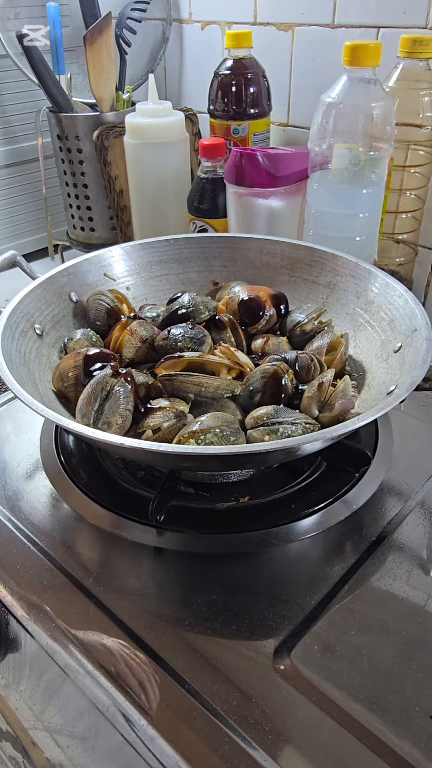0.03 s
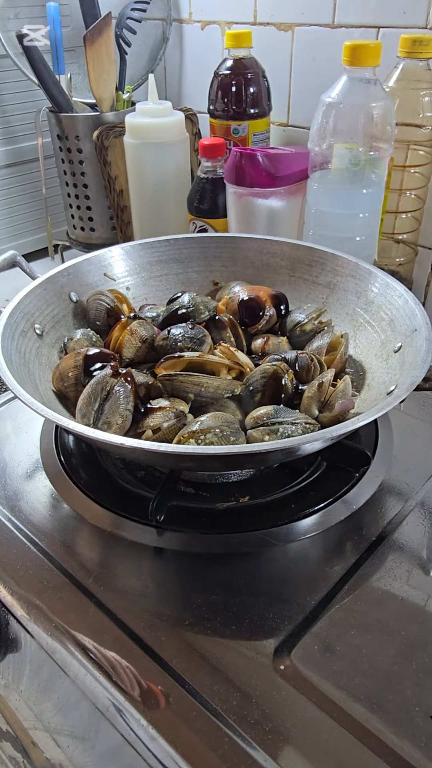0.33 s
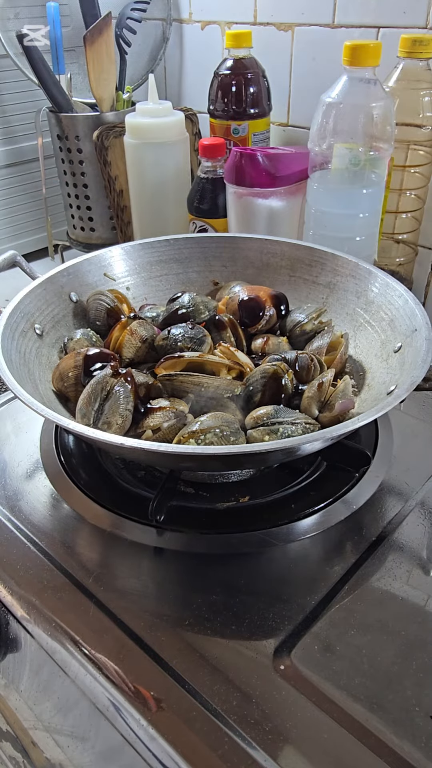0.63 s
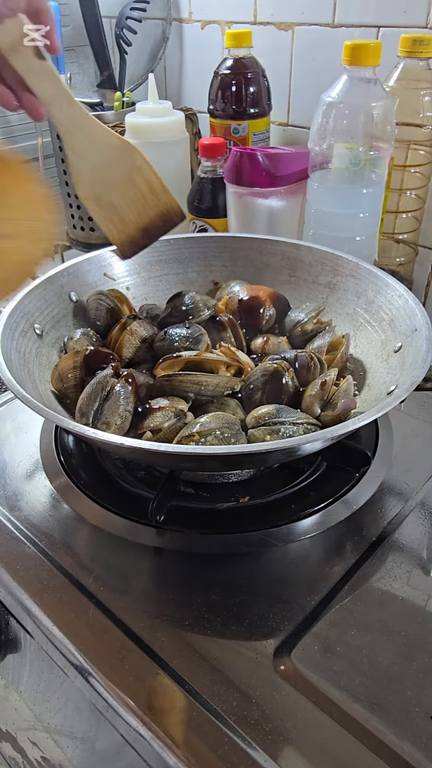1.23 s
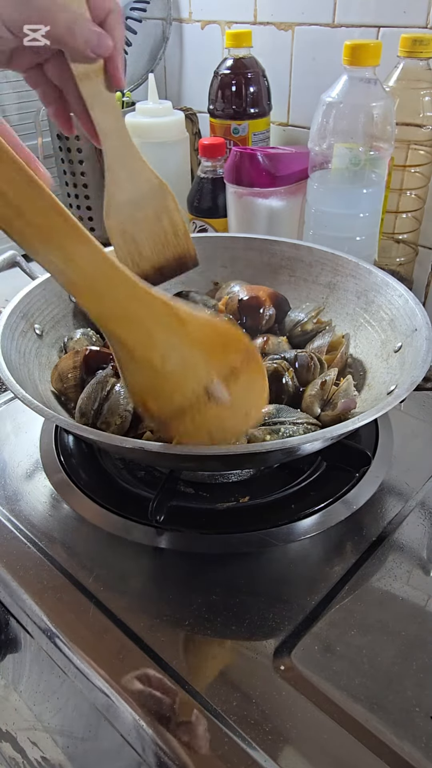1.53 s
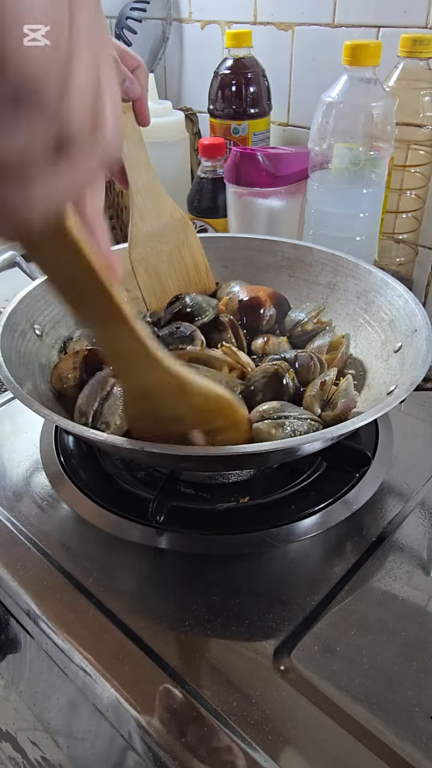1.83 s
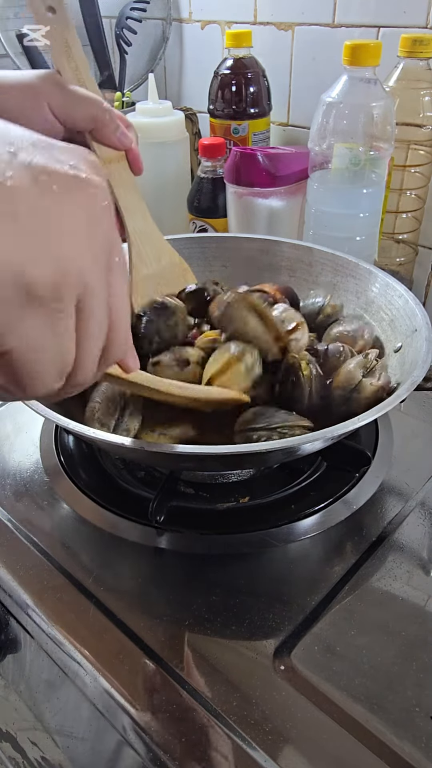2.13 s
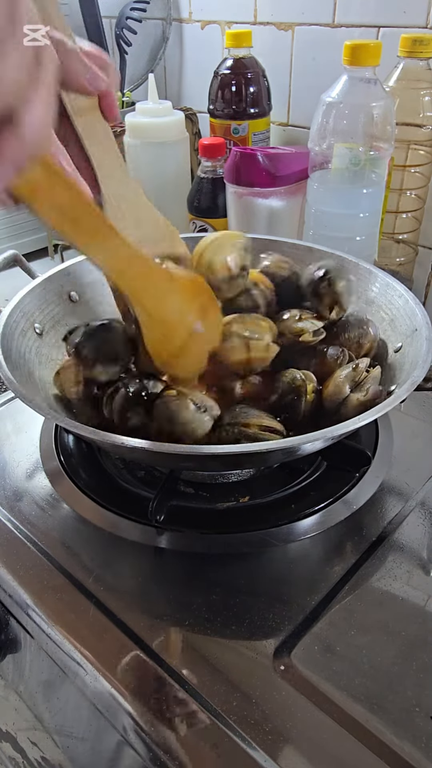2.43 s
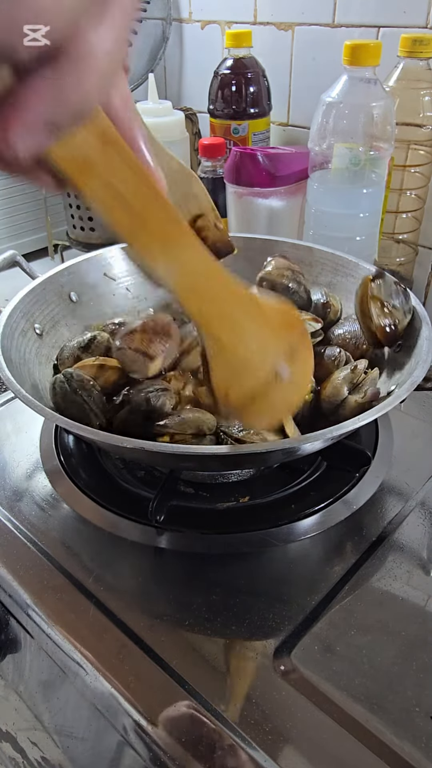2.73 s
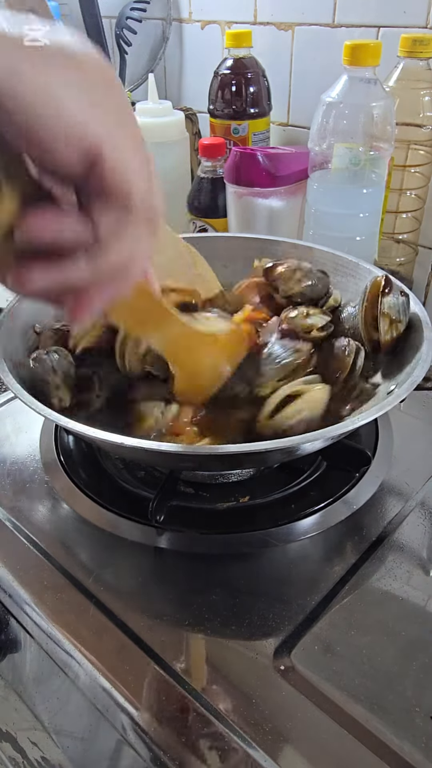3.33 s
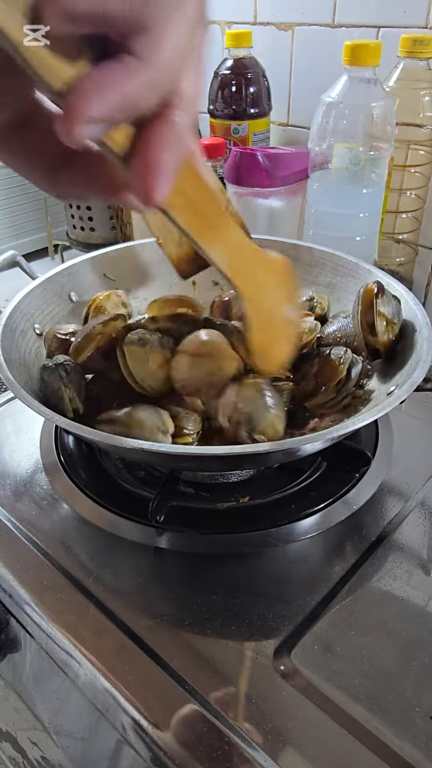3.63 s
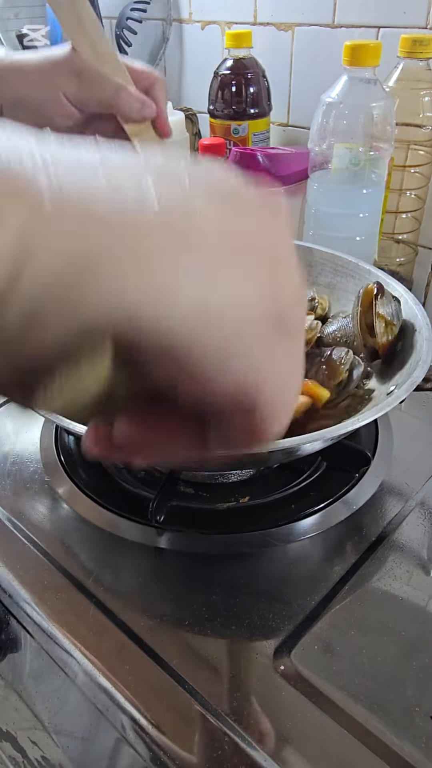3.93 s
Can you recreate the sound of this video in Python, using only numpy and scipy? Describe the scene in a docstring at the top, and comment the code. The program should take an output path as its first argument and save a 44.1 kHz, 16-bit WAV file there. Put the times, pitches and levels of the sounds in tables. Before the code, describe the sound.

Clam shells clack, clink and grind as wooden spatulas stir them around a metal wok. Before the stirring starts, only sauce sizzles softly over a low gas stove rumble, heard close in a small tiled kitchen.

```python
"""Clams stirred in a wok

Sauce sizzles over a rumbling gas stove in a small tiled kitchen; the sound drops out briefly near 0.9 s.
Two wooden spatulas then tap in and push the heap round: shells grind on the metal, clack and clink.
The wok rings faintly with each clack, and clearly when one shell lands on bare metal."""
import sys
import numpy as np
from scipy import signal
from scipy.io import wavfile

SR = 44100
rng = np.random.default_rng(int(sys.argv[2]) if len(sys.argv) > 2 else 0)


def to_wav(sig):
    """Store sig (one row per channel, or 1-D mono) as 16-bit WAV at the path in sys.argv[1].

    Samples outside -1..1 are clipped; the rate is SR.
    """
    pcm = np.clip(np.atleast_2d(sig), -1, 1) * 32767
    pcm = np.round(pcm).astype(np.int16)
    wavfile.write(sys.argv[1], SR, pcm.T)  # frames by channels


N = 176400
TIME = np.arange(N) / SR
CUTOFF_HZ = 15900

# shell and spatula impacts: start_s, level_db, then offsets thud_db, body_db, edge_db, sparkle_db
IMPACTS = [(1.289, -23.5, -16.5, -13.5, -10.5, -22), (1.4228, -25, -12, -12, -12, -28),
           (1.5846, -21.5, -12.5, -10.5, -15, -19), (1.8698, -23.5, -34, -3.5, -6.5, -29),
           (1.888, -16.5, -37, -6, -7.5, -37), (1.896, -20, -29, -4, -12, -32),
           (1.9147, -17.5, -21, -5.5, -19, -17), (2.0553, -20, -19, -3.5, -9, -36),
           (2.1029, -19, -13.5, -5.5, -12, -25), (2.137, -11, -32, -10, -8.5, -12.5),
           (2.1445, -11.5, -37, -8, -15, -41), (2.1634, -16.5, -32, -6, -24, -21),
           (2.2733, -22.5, -34, -8, -6, -19), (2.2913, -15, -24, -14.5, -9, -14.5),
           (2.4105, -13.5, -15, -22, -6.5, -17), (2.4276, -11.5, -17, -11.5, -11.5, -11),
           (2.4561, -10.5, -17, -10.5, -12, -15.5), (2.5786, -8, -18, -14, -13.5, -4),
           (2.6171, -13, -22, -8.5, -18, -15), (2.6312, -11.5, -28, -11, -10, -10),
           (2.6442, -15, -33, -7, -9, -21), (2.6755, -9.5, -22, -15, -13, -11),
           (2.6927, -16.5, -31, -8, -11, -14), (2.7007, -7, -25, -11.5, -14.5, -15),
           (2.7075, -9.5, -23, -11, -9.5, -15), (2.732, -13, -17.5, -21, -9, -18),
           (2.81, -16, -16, -30, -10, -17), (2.9754, -19, -15, -14, -16, -30),
           (3.1258, -19.5, -13, -5.5, -29, -27), (3.1809, -19, -20, -15, -11.5, -15),
           (3.3331, -26, -41, -10, -11, -35), (3.351, -18, -27, -6, -9, -25),
           (3.3647, -9, -15, -9.5, -16.5, -13.5), (3.4223, -15.5, -12, -16, -10, -16),
           (3.5149, -16, -28, -23, -8, -19), (3.5684, -9, -23.5, -16, -8.5, -17),
           (3.5759, -4, -32, -9.5, -12.5, -11), (3.6179, -15, -14.5, -15, -16, -12),
           (3.6341, -5.5, -36, -12, -12.5, -20), (3.6473, -11.5, -28, -20, -16, -15),
           (3.6595, -16, -17, -15, -9.5, -13), (3.7075, -20, -21, -18, -8.5, -12),
           (3.923, -17, -22, -11, -12, -12), (3.933, -20, -25, -8, -7.5, -19),
           (3.9617, -13, -38, -22, -8.5, -10.5)]


def clack(levels_db):
    """One struck shell: a noisy crack plus random modes, decaying in four bands."""
    # clack bands, thud to sparkle: low_hz, high_hz, gain_db, t60_s
    registers = [(217, 910, -2.5, 0.077), (943, 3000, -5, 0.019), (2690, 5570, -2, 0.022),
                 (5700, 14500, -6, 0.029)]
    mode_count, crack_share, chatter_s = 60, 0.63, 0.003
    t = TIME[:SR // 14]
    hz = np.geomspace(230, 15000, mode_count) * np.exp(rng.uniform(-.04, .04, mode_count))
    weights = rng.standard_normal((2, mode_count)) * np.sqrt(hz)
    modes = rms_one(weights @ np.sin(2 * np.pi * hz[:, None] * t))
    crack = rng.standard_normal((2, len(t)))
    struck = wok_body(np.sqrt(1 - crack_share) * modes + np.sqrt(crack_share) * crack)
    out = 0
    for db, (low_hz, high_hz, gain_db, t60_s) in zip(levels_db, registers):
        envelope = decay(np.maximum(t - chatter_s, 0), t60_s)
        part = band(band(struck, low_hz, high_hz) * envelope, low_hz, high_hz)
        onset_rms = np.sqrt(np.mean(part[:, :SR // 100] ** 2, axis=1, keepdims=True))
        out = out + from_db(db + gain_db) * stereo(*(part / onset_rms), np.sqrt(low_hz * high_hz))
    return lowpass(out, 9200)  # sauce cushions the contact


def clacks():
    """Spatulas tap; shells fall on each other and on the wok."""
    out = np.zeros((2, N + SR))
    for start_s, level_db, *offsets_db in IMPACTS:
        start = int(start_s * SR)
        sound = clack(level_db + np.array(offsets_db))
        out[:, start:start + sound.shape[1]] += sound
    return out[:, :N]


def clinks():
    """Pitched contacts, wooden bump to shell clink: a main mode and a shorter, higher twin."""
    # pitched contacts: start_s, pitch_hz, level_db, t60_s
    contacts = [(1.586, 686, -32, 0.11), (1.585, 3180, -24, 0.03), (1.728, 421, -28.5, 0.042),
                (1.890, 2890, -17.5, 0.044), (1.916, 2160, -22, .03), (2.144, 4800, -11, 0.014),
                (2.200, 1382, -21.5, 0.056), (2.292, 3760, -22, 0.023), (2.580, 7300, -18, 0.034),
                (2.619, 2146, -10.5, 0.036), (2.619, 1385, -19, .09), (2.632, 2025, -12, 0.053),
                (2.633, 1050, -20.5, 0.11), (2.693, 2240, -16, .03), (2.703, 1941, -17.5, 0.12),
                (2.976, 5200, -25, .012), (3.028, 5630, -28, 0.071), (3.036, 6500, -28, 0.036),
                (3.126, 6500, -26.5, 0.037), (3.334, 4000, -16.5, 0.031), (3.428, 4650, -23, 0.035),
                (3.515, 2710, -19, 0.032), (3.635, 2120, -7, 0.04), (3.635, 2400, -10, .028),
                (3.649, 2260, -7.5, 0.026), (3.963, 1060, -21, 0.094)]
    out = np.zeros((2, N))
    for start_s, pitch_hz, level_db, t60_s in contacts:
        click = np.zeros(N)
        click[int(start_s * SR)] = from_db(level_db)
        twin_hz = pitch_hz * (1 + 0.051 * rng.uniform(0.2, 2.5))
        out += stereo(ring(click, pitch_hz, t60_s), ring(click, twin_hz, t60_s / 2), pitch_hz)
    return out


def wok_ring():
    """Each impact excites the wok's free modes; a hit on bare metal does so most."""
    # wok modes: pitch_hz, gain_db, t60_s
    modes = [(2401, -14, .3), (2923, -10, 0.25), (3021, 3, 0.32), (3090, -5, 0.33), (3709, -12, .35)]
    coupling_db, bare_hit_s, bare_hit_db = -34, 2.704, -19.5
    blows = np.zeros(N)
    for start_s, level_db, *_ in IMPACTS:
        blows[int(start_s * SR)] = from_db(level_db + coupling_db)
    blows[int(bare_hit_s * SR)] = from_db(bare_hit_db)
    return sum(from_db(db) * ring(blows, hz, t60_s) for hz, db, t60_s in modes)


def wok_body(x):
    """The loaded bowl lifts a few broad resonances."""
    # bowl resonances: centre_hz, width_hz, lift_db
    resonances = [(273, 25, 5.5), (450, 30, 4.5), (691, 72, 6.5), (1374, 43, 4), (2100, 160, 3),
                  (7630, 1900, 6)]
    out = x
    for centre_hz, width_hz, lift_db in resonances:
        r, w = np.exp(-np.pi * width_hz / SR), 2 * np.pi * centre_hz / SR
        resonance = (1 - r * r) / 2 * signal.lfilter([1, 0, -1], [1, -2 * r * np.cos(w), r * r], x)
        out = out + (from_db(lift_db) - 1) * resonance
    return out


def stirring():
    """The pushed heap scrapes over the metal and rattles within itself."""
    # push on the heap: time_s, relative_db
    push = [(1.2, -83), (1.8, -57), (1.85, -41.5), (1.885, -36.5), (1.95, -34), (2.04, -29), (2.16, -32.5),
            (2.25, -35.5), (2.37, -34), (2.415, -31), (2.45, -36), (2.52, -34.5), (2.575, -40.5),
            (2.64, -33.5), (2.72, -31), (2.79, -35.5), (2.87, -39.5), (2.96, -38.5), (3.03, -32),
            (3.15, -34.5), (3.23, -41.5), (3.31, -39), (3.38, -36), (3.44, -32.5), (3.50, -37), (3.55, -33),
            (3.59, -29.5), (3.66, -34), (3.73, -39), (3.80, -41.5), (3.87, -44.5), (3.92, -31.5),
            (3.97, -31.5), (4.0, -32)]
    # grinding spectrum: freq_hz, density_db
    spectrum = [(120, -36), (200, -7.5), (273, -1.5), (310, -9.5), (446, -3), (798, -7.5), (1090, -1),
                (1950, -5), (2210, 1), (4840, -6.5), (9830, -28), (15500, -10)]
    push_db, = in_time(push)
    friction = banded_noise(spectrum, flicker_db=2.5, flicker_hz=23, bands=16)
    roughness = from_db(3 * drift(rate_hz=22))
    scrape = from_db(-2.5) * rms_one(friction * roughness)
    rattle = grains(spectrum, per_s=420, spread_db=2.5, t60_s=0.02, low_hz=221.7, high_hz=7530, modes=10)
    return from_db(push_db + 1.5) * wok_body(scrape + from_db(-1.5) * rattle)


def sizzle():
    """Frying sauce: fine hiss and tiny bursting bubbles."""
    # hiss level: time_s, level_db
    levels = [(0, -41.5), (.9, -42), (.97, -46), (1.8, -41.5), (4, -41.5)]
    # frying spectrum: freq_hz, density_db
    spectrum = [(290, -30), (500, -10.5), (611, -2), (839, -7.5), (1270, -4.5), (1620, -7.5), (2200, -6),
                (3530, -5), (4250, -3.5), (5920, -10.5), (11600, -14.5), (15500, -15)]
    level_db, = in_time(levels)
    spits = grains(spectrum, per_s=900, spread_db=1.5, t60_s=0.008, low_hz=1460, high_hz=CUTOFF_HZ, modes=3)
    hiss = banded_noise(spectrum, flicker_db=1.54, flicker_hz=15, bands=18)
    return from_db(level_db) * (hiss + from_db(-10) * spits)


def stove():
    """Gas stove: low rumble with a wavering drone."""
    # rumble level: time_s, level_db
    levels = [(0, -36), (.9, -41), (1.5, -41.5), (3, -37), (3.6, -38)]
    # rumble spectrum: freq_hz, density_db
    spectrum = [(13, -46), (22, -24.5), (75, 3.5), (162, -12), (193, -18.5), (230, -6), (258, -34.5),
                (354, -16.5), (392, -16), (580, -26), (700, -30), (910, -61), (1540, -120)]
    # swelling drone: time_s, pitch_hz, level_db
    swells = [(0, 79.5, -38), (.2, 77.6, -44.5), (.29, 75.6, -29.5), (.45, 76.7, -31.5), (.57, 78.5, -32.5),
              (.64, 77.7, -40), (.9, 79.2, -45.5), (1.0, 65.7, -47), (1.22, 64.8, -39), (1.35, 66.5, -50),
              (1.7, 65.1, -45), (1.95, 66.8, -37), (2.25, 68.6, -44), (3, 70, -62), (4, 75, -61)]
    rumble_db, = in_time(levels)
    pitch_hz, drone_db = in_time(swells)
    phase = 2 * np.pi * np.cumsum(pitch_hz * (1 + 0.029 * drift(rate_hz=9.8))) / SR
    drone = np.sqrt(2) * from_db(drone_db + 1.5 * drift(rate_hz=13)) * np.sin(phase)
    rumble = from_db(rumble_db) * banded_noise(spectrum, flicker_db=3, flicker_hz=7.4, bands=11)
    return rumble + drone


def kitchen(x):
    """Dense reflections off tiles and steel, alike on both sides in the bass."""
    gain_db, delay_s, alike_below_hz = -3.5, 0.00407, 610
    t = TIME[:SR // 2]
    mid, side = rng.standard_normal((2, len(t))) * decay(t, t60_s=0.31) * (t > delay_s)
    tail = mid + band(side, alike_below_hz, CUTOFF_HZ) * [[1], [-1]]
    tail = lowpass(tail / np.sqrt(np.sum(tail ** 2) / 2), 6900)
    return from_db(gain_db) * signal.fftconvolve(x, tail, axes=1)[:, :N]


def banded_noise(spectrum, flicker_db, flicker_hz, bands):
    """Stereo noise whose bands flicker independently; unit rms."""
    edges_hz = np.geomspace(spectrum[0][0], spectrum[-1][0], bands + 1)
    white = rng.standard_normal((2, 2, N))
    out = 0
    for k, (low_hz, high_hz) in enumerate(zip(edges_hz, edges_hz[1:])):
        mid, side = band(white[k % 2], low_hz, high_hz)
        hz = np.sqrt(low_hz * high_hz)
        gain = from_db(at_hz(spectrum, hz) + flicker_db * drift(flicker_hz))
        out = out + gain * stereo(mid, side, hz)
    return rms_one(out)


def grains(spectrum, per_s, spread_db, t60_s, low_hz, high_hz, modes):
    """Random small impacts with random modes, dying faster than t60_s above 1 kHz; unit rms."""
    draws = rng.random((5000, 2 + modes))  # per grain: gap, size, mode pitches
    weights = rng.standard_normal((5000, 2, modes))
    starts_s = np.cumsum(-np.log(1 - draws[:, 0])) / per_s
    t = TIME[:int(t60_s * SR)]
    out = np.zeros((2, N + SR))
    for start_s, draw, (mid, side) in zip(starts_s[starts_s < N / SR], draws, weights):
        hz = low_hz * (high_hz / low_hz) ** ((np.arange(modes) + draw[2:]) / modes)
        mode_t60_s = t60_s * np.sqrt(1000 / np.maximum(hz, 1000))
        size_db = spread_db * min(-np.log(1 - draw[1]), 3.5)
        gains = from_db(size_db + at_hz(spectrum, hz)) * np.sqrt(hz / mode_t60_s) * stereo(mid, side, hz)
        ringing = np.sin(2 * np.pi * hz[:, None] * t) * decay(t, mode_t60_s[:, None])
        start = int(start_s * SR)
        out[:, start:start + len(t)] += gains @ ringing
    return rms_one(out[:, :N])


def stereo(mid, side, hz):
    """Mid and side to left and right, with the width and balance at hz."""
    # left-right likeness: freq_hz, correlation
    likeness = [(40, 0.74), (120, 1), (250, 0.83), (500, 0.82), (1000, 0.37), (4000, 0.054), (14000, 0.05)]
    # balance: freq_hz, left_minus_right_db
    balance = [(100, -1), (1000, -1.1), (2000, 2), (4000, -3.5), (8000, 4), (13000, 0.5)]
    sign = np.array([[1], [-1]])
    alike = at_hz(likeness, hz)
    pan = from_db(sign * at_hz(balance, hz) / 2)
    return pan * (np.sqrt(1 + alike) * mid + np.sqrt(1 - alike) * side * sign) / np.sqrt(2)


def ring(clicks, hz, t60_s):
    """Resonator: a unit click starts a decaying unit sine."""
    r, w = decay(1 / SR, t60_s), 2 * np.pi * hz / SR
    return signal.lfilter([0, np.sin(w)], [1, -2 * r * np.cos(w), r * r], clicks + 1e-18)


def drift(rate_hz):
    """Smooth random curve; unit rms."""
    hop, warmup = 40, 2000
    r = np.exp(-2 * np.pi * rate_hz * hop / SR)
    white = rng.standard_normal(N // hop + warmup + 2)
    slow = signal.lfilter([1], [1, -2 * r, r * r], white)[warmup:]
    return np.interp(np.arange(N) / hop, np.arange(len(slow)), rms_one(slow))


def in_time(rows):
    """Breakpoint columns at every sample."""
    times_s, *columns = np.transpose(rows)
    return [np.interp(TIME, times_s, column) for column in columns]


def at_hz(points, hz):
    """Interpolate on a log-frequency axis."""
    freqs_hz, values = np.transpose(points)
    return np.interp(np.log(hz), np.log(freqs_hz), values)


def band(x, low_hz, high_hz):
    return signal.sosfilt(signal.butter(2, [low_hz, high_hz], "band", fs=SR, output="sos"), x)


def lowpass(x, hz):
    return signal.sosfilt(signal.butter(1, hz, fs=SR, output="sos"), x)


def decay(t, t60_s):
    return np.exp(-np.log(1000) * t / t60_s)


def from_db(db):
    return 10 ** (np.asarray(db) / 20)


def rms_one(x):
    return x / np.sqrt(np.mean(x ** 2) + 1e-20)


def scene():
    """Wok, room and stove; the wok's sound reaches the left side first."""
    right_lag_s = 0.00016
    hits, grinding, pings = clacks(), stirring(), clinks()
    room = kitchen(hits + 0.35 * pings + 0.59 * grinding)  # clinks and grinding drier than the clacks
    left, right = hits + wok_ring() + pings + grinding + room + sizzle()
    return np.array([left, np.interp(TIME - right_lag_s, TIME, right)]) + stove()


def record(dry):
    """Brief dropout, soft clipping, steep low-pass."""
    start_s, end_s, fade_s, dropout_db = 0.907, 0.96, 0.004, -36
    gap = np.clip(np.minimum(TIME - start_s, end_s - TIME) / fade_s, 0, 1)
    clipped = np.tanh(dry * from_db(dropout_db * gap))
    return signal.sosfilt(signal.ellip(12, .2, 80, CUTOFF_HZ, fs=SR, output="sos"), clipped)


dry = scene()
out = record(dry)
to_wav(out)
```